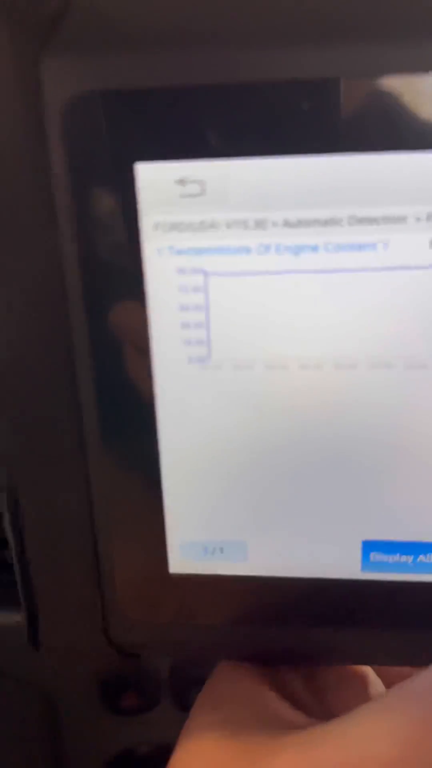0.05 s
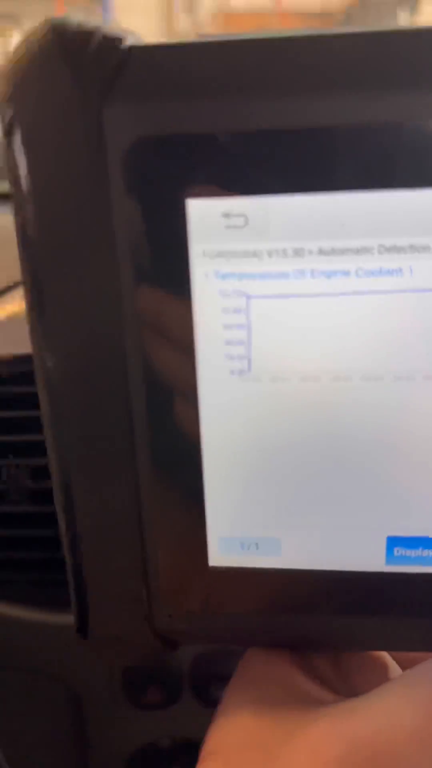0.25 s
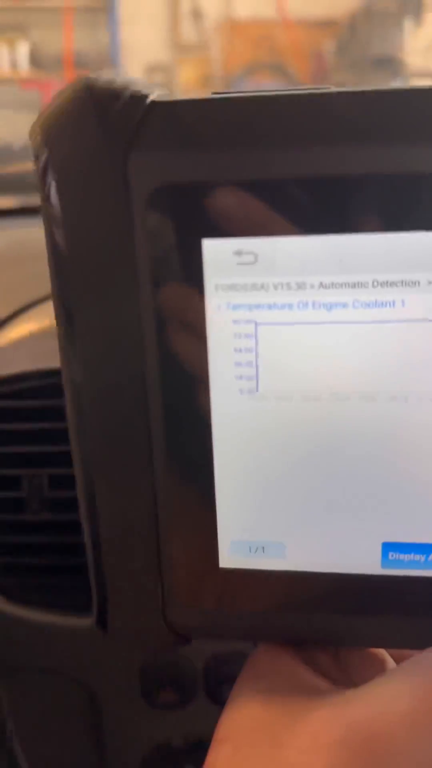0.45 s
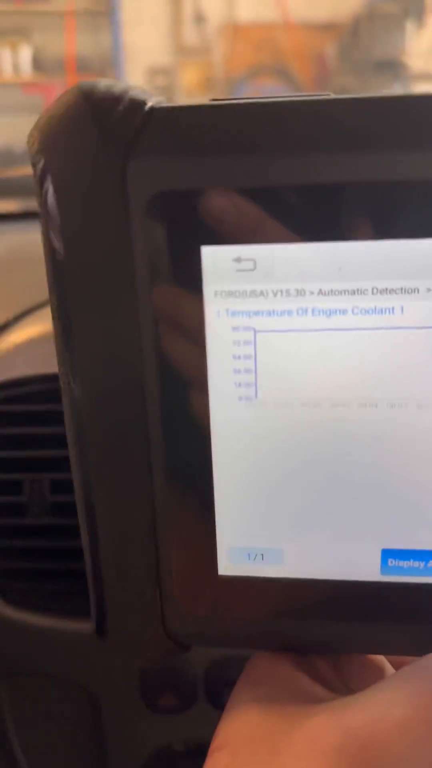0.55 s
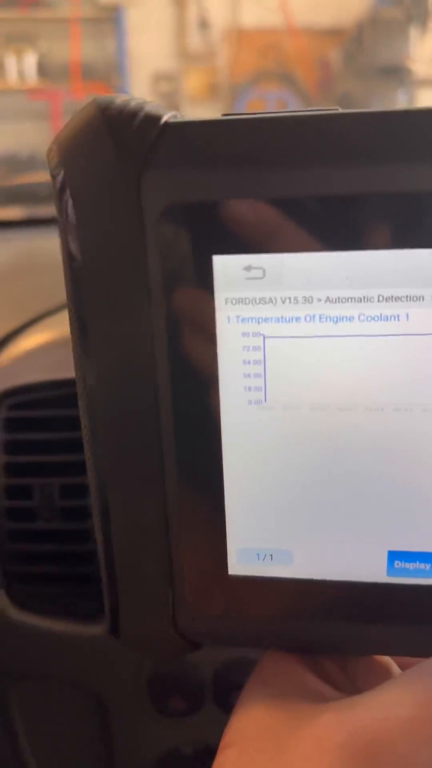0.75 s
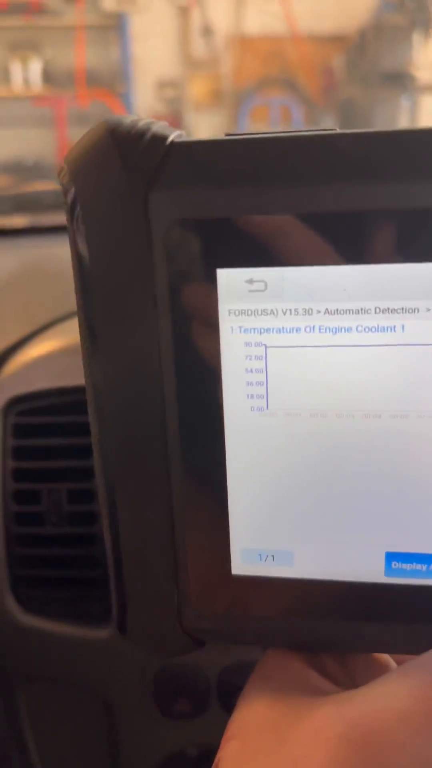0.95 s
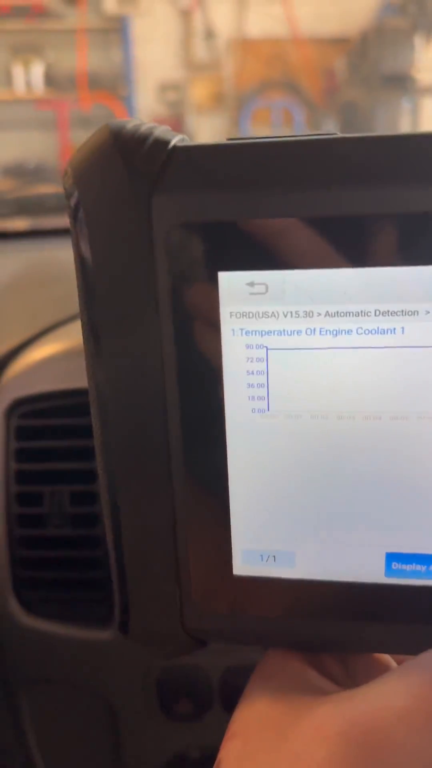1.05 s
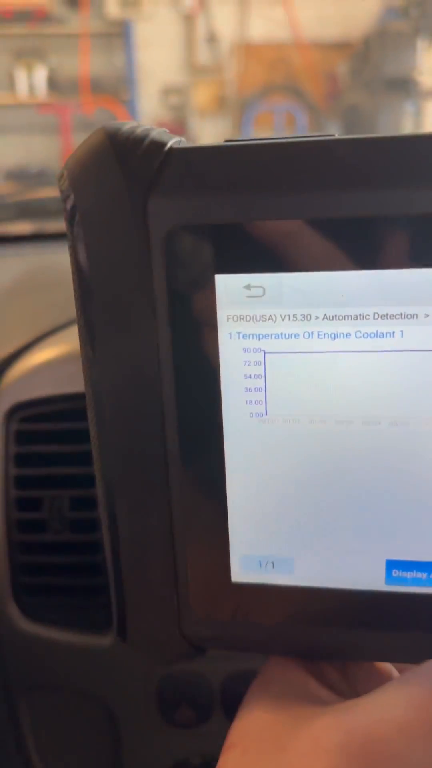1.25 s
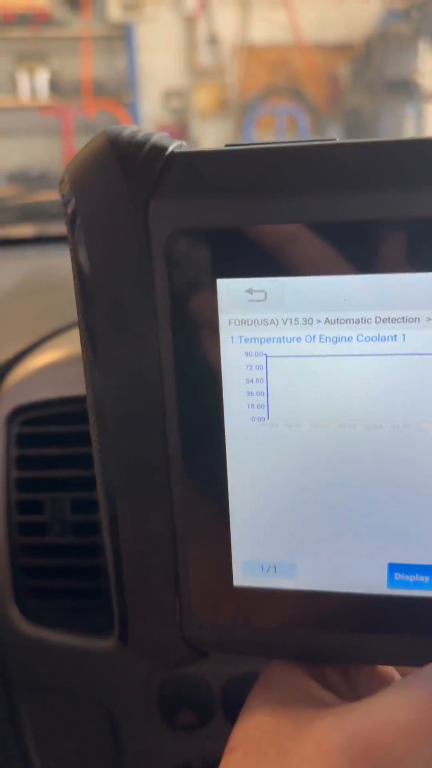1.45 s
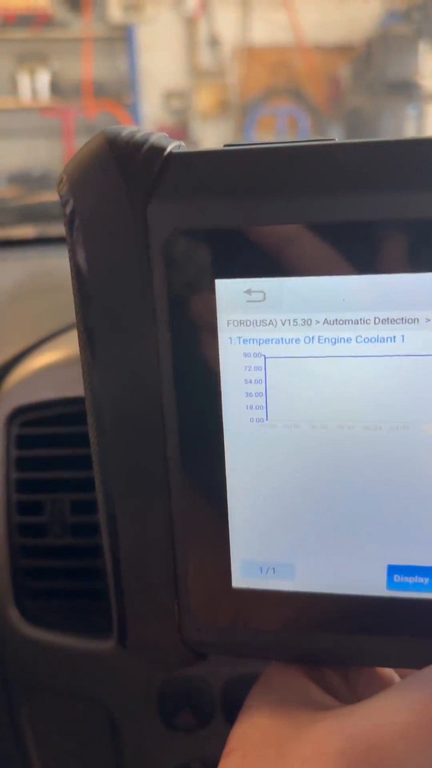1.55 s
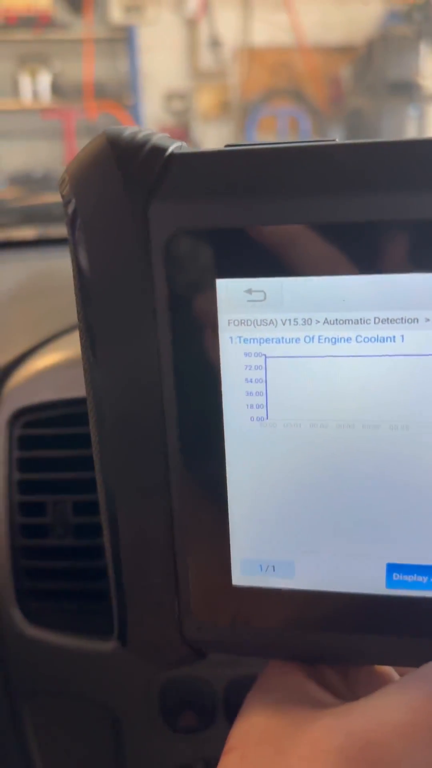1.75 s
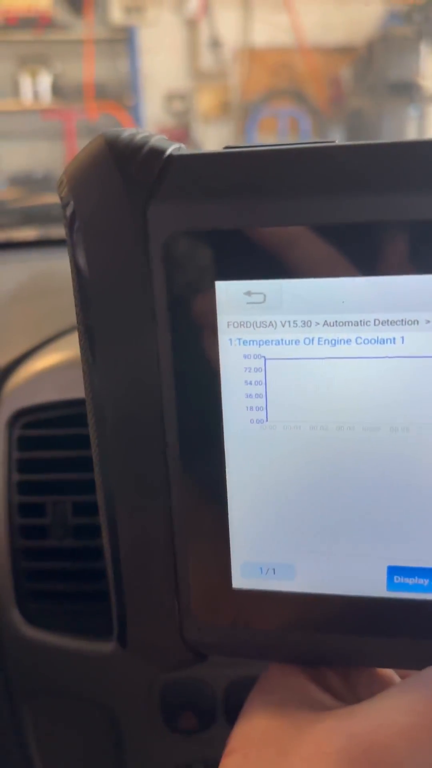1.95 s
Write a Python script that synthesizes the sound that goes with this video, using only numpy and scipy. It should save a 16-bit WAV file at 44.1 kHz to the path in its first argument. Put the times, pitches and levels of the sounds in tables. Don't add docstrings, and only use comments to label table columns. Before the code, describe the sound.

A six-cylinder engine idles continuously, a deep, buzzing throb booming inside a parked car's cabin, over faint body rumble and vent hiss; a phone in the cabin picks up a barely audible cloth rustle and later a tiny plastic tick.

```python
import sys
import numpy as np
from scipy import signal
from scipy.fft import rfft, irfft
from scipy.io import wavfile
from scipy.ndimage import uniform_filter1d

SR = 44100
rng = np.random.default_rng(int(sys.argv[2]) if len(sys.argv) > 2 else 0)


def unload_wav(signal):
    wavfile.write(
        sys.argv[1],
        SR,
        np.round(np.clip(np.atleast_2d(signal).T, -1, 1) * 32767).astype(np.int16),
    )


def amplitude_ratio(level_db):
    exponent = np.asarray(level_db, float) / 20
    return 10 ** exponent


N = 88200
LEFT_RIGHT = np.array([[1], [-1]])

# time in seconds, firing rate of one bank in Hz.
IDLE_SPEED = [
    (0.0, 22.049),
    (0.45, 22.109),
    (0.8, 22.253),
    (1.05, 22.001),
    (1.45, 22.037),
    (1.7, 21.791),
    (1.85, 21.595),
    (2.0, 21.618),
]
# multiple of the bank rate, level in dB.
FIRING_ORDERS = [(1, -42), (2, -1), (3, -12.5), (4, -9.5), (5, -18.5), (6, -15.5), (7, -30), (8, -20),
                 (9, -20.5), (10, -14.5), (11, -32.5), (12, -27), (13, -44), (14, -35), (15, -45.5),
                 (16, -39.5), (17, -52.5), (18, -37), (19, -45.5), (20, -43.5), (21, -50), (22, -50.5),
                 (23, -55.5), (24, -55), (25, -61), (26, -53)]
# multiple of the whole engine cycle rate, level in dB.
UNEVEN_ORDERS = [(4, -32), (5, -33.5), (7, -36), (16, -32.5), (17, -39.5), (23, -29.5), (26, -34),
                 (28, -26.5), (29, -27), (31, -24.5), (32, -39), (35, -31), (40, -40.5), (41, -40),
                 (44, -39.5)]
# time in seconds, boom on the firing tone in dB, ring on upper and uneven orders in dB.
CABIN_SWELL = [
    (0, 0, -2.5),
    (.5, 1, 0.5),
    (.9, 1.5, -1.5),
    (1.3, -.5, 1),
    (1.6, 0.5, 1.5),
    (1.8, -4, 0.5),
    (2, -3.5, 4),
]
# frequency in Hz, density in dB per Hz.
RUMBLE_SPECTRUM = [(25, -11.5), (40, -5.5), (80, -5), (160, -7), (215, -7.5), (250, -8), (300, -13),
                   (450, -29.5)]
# time in seconds, whine pitch in Hz, level in dB.
BELT_WHINE = [
    (0.03, 1402, -60.5),
    (0.392, 1410, -62),
    (0.922, 1417, -58),
    (0.964, 1398, -62.5),
    (1.654, 1396, -61),
    (1.756, 1425, -64.5),
    (1.932, 1376, -59.5),
    (1.95, 1400, -63),
]
# multiple of the bank rate, level in dB, flutter in dB, flutter in radians.
GEAR_WHINES = [
    (27.75, -62, 4, 1.3),
    (34.78, -69, 4.5, .9),
]
# frequency in Hz, density in dB per Hz.
VENT_MID_SPECTRUM = [(300, -20), (450, -1.5), (800, -10), (1300, -12.5), (2020, -21), (7070, -28),
                     (9570, -35), (10500, -45)]
# frequency in Hz, density in dB per Hz.
VENT_SIDE_SPECTRUM = [(300, -12.5), (450, 1), (700, -3), (1300, -11), (1750, -22.5), (2400, -9.5),
                      (3300, -12), (10500, -24.5)]
# centre in Hz, width in Hz, level in dB.
VENT_WHISTLES = [(5508, 170, -75.5), (2470, 200, -77.5), (6870, 1000, -77.5)]
# frequency in Hz, left level in dB, right level in dB, 60 dB decay in seconds.
PLASTIC_MODES = [(2580, 4, 3, 0.025), (2950, 4, -2, .006), (2018, -8, 2, .02), (6600, -14, -14, .025),
                 (7840, -18, -7, .02)]


def level(x, db):
    return x * amplitude_ratio(db) / np.sqrt(np.mean(x ** 2))


def walk(rate):
    hold = int(SR / rate)
    steps = np.repeat(rng.standard_normal(N // hold + 1), hold)
    return 1.3 * uniform_filter1d(uniform_filter1d(steps, hold), hold)[:N]


def band(hz, width):
    f = np.fft.rfftfreq(N, 1 / SR)
    bell = np.exp(-((f - hz) / width) ** 2)
    return level(irfft(rfft(rng.standard_normal(N)) * bell, N), 0)


def coloured(spectrum, swell_db, flicker_db):
    hz, density_db = np.array(spectrum, float).T
    f = np.fft.rfftfreq(N, 1 / SR) + 1
    shape_db = np.interp(np.log(f), np.log(hz), density_db, left=-90, right=-90)
    noise = rfft(rng.standard_normal(N)) * amplitude_ratio(shape_db)
    third = 3 * np.log2(f / hz[0])
    swell = swell_db * walk(1.5)
    out = 0
    for k in range(int(3 * np.log2(hz[-1] / hz[0])) + 2):
        overlap = np.clip(1 - abs(third - k), 0, 1)
        out = out + irfft(noise * overlap, N) * amplitude_ratio(swell + flicker_db * walk(8.96))
    return out


def engine(turn, hz, boom_db, ring_db):
    orders = list(FIRING_ORDERS) + [(m / 3, db) for m, db in UNEVEN_ORDERS]
    out = 0
    for k, db in orders:
        odd, uneven = k % 2 == 1, k % 1 > 0
        ring_hz, ring_width_hz = (165 if odd else 240), 44
        lag = 1.95 * np.arctan2(k * hz * ring_width_hz, ring_hz ** 2 - (k * hz) ** 2)
        lag = lag + odd * k * 0.085 - uneven * k * 0.08
        lag = lag + (uneven and k < 9.5) * 2.72
        swell_db = (k == 2) * boom_db + (uneven or k > 11) * ring_db
        drift_db = (0.24 + k * 0.0597) * walk(8.02)
        pan_db = LEFT_RIGHT * (0.82 + k * 0.0329) / 2
        side_lag = np.pi * hz * LEFT_RIGHT * 0.0001
        phase = k * (turn + side_lag + 0.02 * walk(8.05)) - lag
        out = out + amplitude_ratio(db + swell_db + drift_db + pan_db) * np.sin(phase)
    scatter = amplitude_ratio(0.37 * walk(30))
    return np.sqrt(2) * amplitude_ratio(-20) * scatter * out


def rumble():
    rumble_db, side_db = -46, -14.5
    mid = level(coloured(RUMBLE_SPECTRUM, swell_db=3.5, flicker_db=0.0), rumble_db)
    side = level(coloured(RUMBLE_SPECTRUM, swell_db=-2.5, flicker_db=2.0), rumble_db + side_db)
    return mid + LEFT_RIGHT * side


def whines(t, turn):
    when, belt_hz, belt_db = np.array(BELT_WHINE).T
    belt_phase = 2 * np.pi * np.cumsum(np.interp(t, when, belt_hz)) / SR
    tones = [(belt_phase, np.interp(t, when, belt_db), 1.5, 0.45)]
    tones += [(k * turn, db, flutter_db, rad) for k, db, flutter_db, rad in GEAR_WHINES]
    side_lag_rad, pan_db = 0.6, 5
    out = 0
    for phase, db, flutter_db, flutter_rad in tones:
        loudness = np.sqrt(2) * amplitude_ratio(db + flutter_db * walk(22.05))
        out = out + loudness * np.sin(phase + flutter_rad * walk(30) + LEFT_RIGHT * side_lag_rad / 2)
    return out * amplitude_ratio(LEFT_RIGHT * pan_db / 2)


def vents():
    mid = level(coloured(VENT_MID_SPECTRUM, swell_db=0.5, flicker_db=1.6), -55)
    side = level(coloured(VENT_SIDE_SPECTRUM, swell_db=2.8, flicker_db=0.3), -58.5)
    whistle = sum(amplitude_ratio(db + 2.5 * walk(12.05)) * band(hz, width) for hz, width, db in VENT_WHISTLES)
    pan_db = 0.4
    return (mid + whistle + LEFT_RIGHT * side) * amplitude_ratio(LEFT_RIGHT * pan_db / 2)


def cloth_rustle(t):
    start_s, length_s = 0.4, 0.13
    puff = np.exp(-((t - start_s) / length_s) ** 2)
    fibres = np.array([band(3430, 600) for _ in LEFT_RIGHT])
    return amplitude_ratio(-67 + 1.5 * walk(44)) * puff * fibres


def plastic_tick(t):
    tick_s, tick_db = 1.5955, -50
    since = np.clip(t - tick_s, 0, 1)
    out = 0
    for hz, left_db, right_db, t60_s in PLASTIC_MODES:
        side_db = np.array([[left_db], [right_db]])
        out = out + amplitude_ratio(tick_db + side_db - 60 * since / t60_s) * np.sin(2 * np.pi * hz * since)
    return out


def scene():
    t = np.arange(N) / SR
    hz = np.interp(t, *np.array(IDLE_SPEED).T)
    turn = 2 * np.pi * (0.301 + np.cumsum(hz) / SR)
    when, boom, ring = np.array(CABIN_SWELL).T
    motor = engine(turn, hz, np.interp(t, when, boom), np.interp(t, when, ring))
    return motor + rumble() + whines(t, turn) + vents() + cloth_rustle(t) + plastic_tick(t)


def low_pass(x):
    return signal.sosfilt(signal.butter(12, 15650, fs=SR, output="sos"), x)


def record(dry):
    top_cut = signal.ellip(6, 0.1, 40, 10250, fs=SR, output="sos")
    mix = signal.sosfiltfilt(top_cut, dry)
    return low_pass(mix)


dry = scene()
out = record(dry)
unload_wav(out)
```